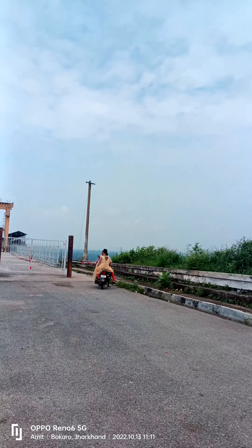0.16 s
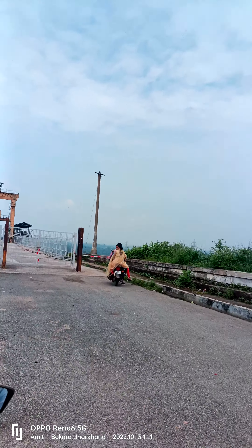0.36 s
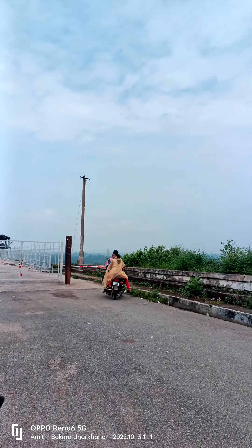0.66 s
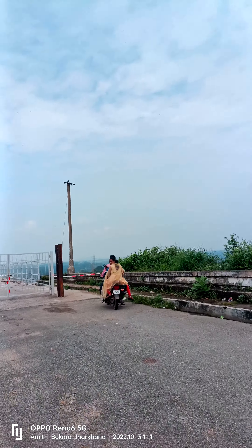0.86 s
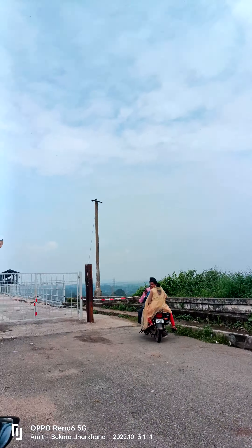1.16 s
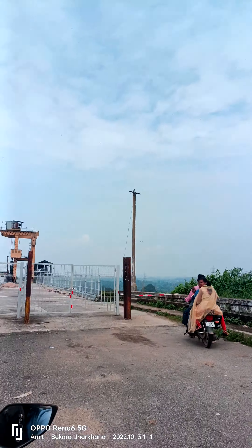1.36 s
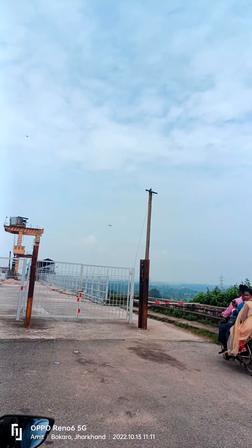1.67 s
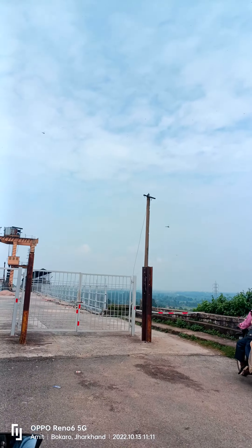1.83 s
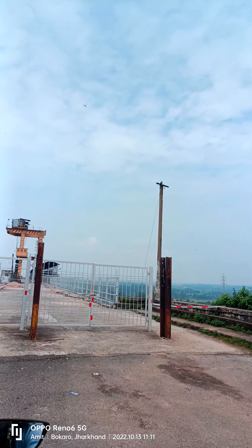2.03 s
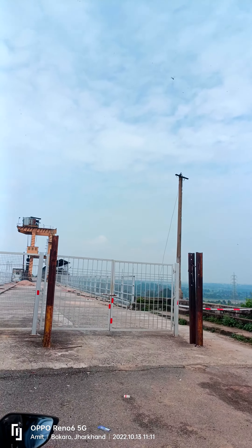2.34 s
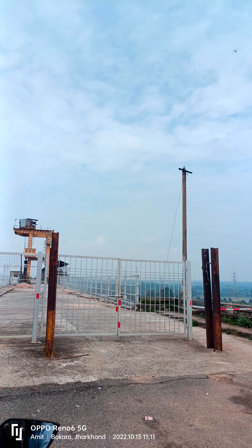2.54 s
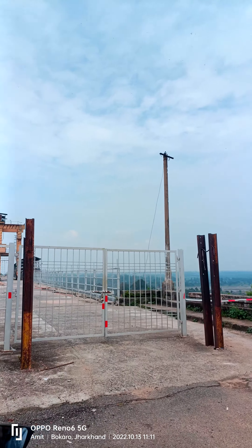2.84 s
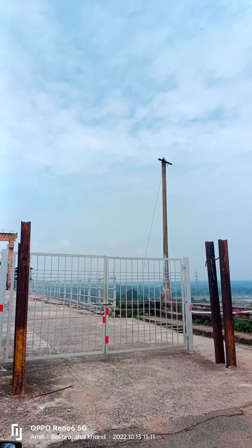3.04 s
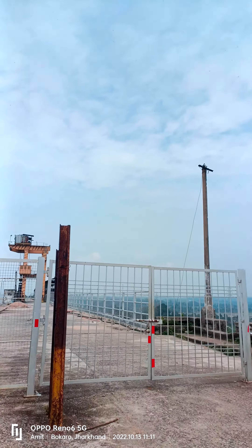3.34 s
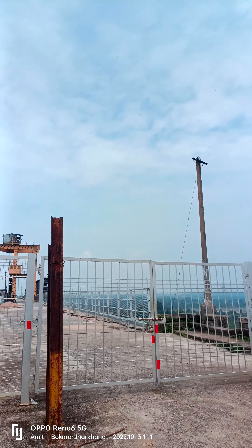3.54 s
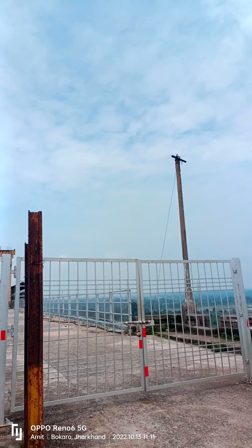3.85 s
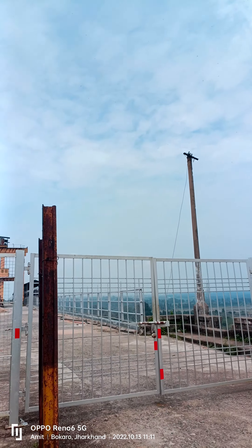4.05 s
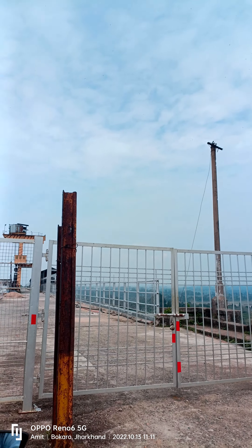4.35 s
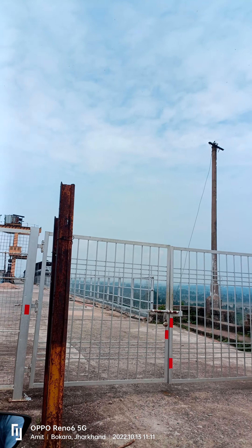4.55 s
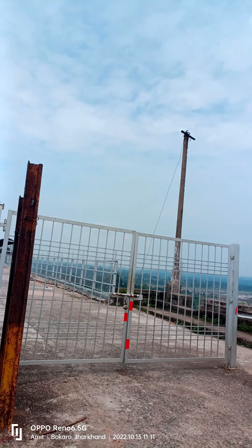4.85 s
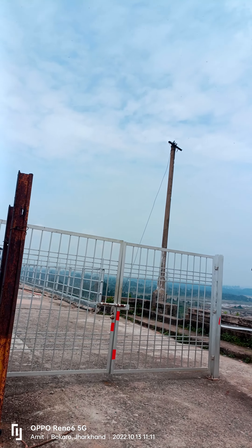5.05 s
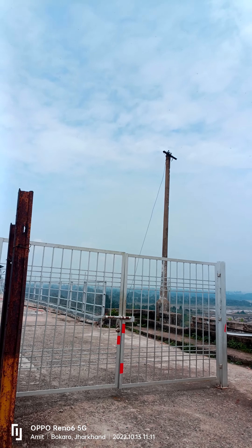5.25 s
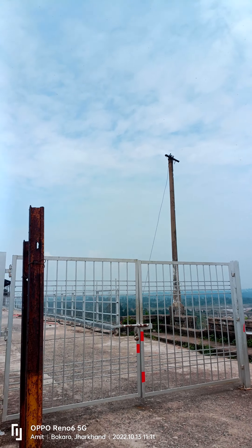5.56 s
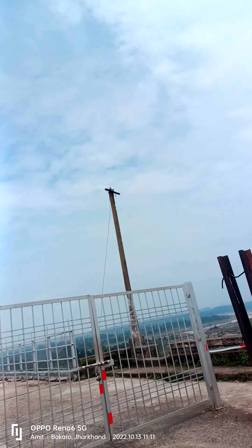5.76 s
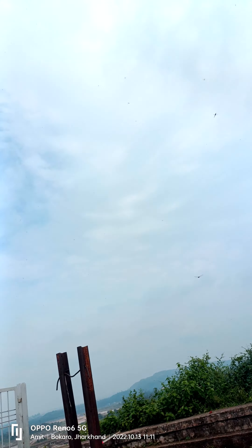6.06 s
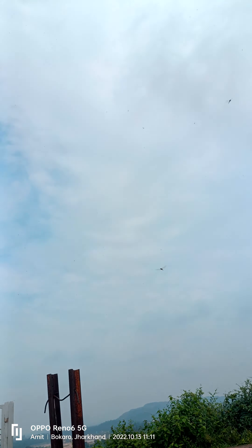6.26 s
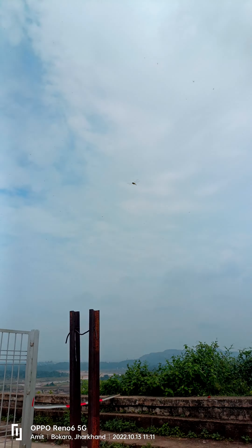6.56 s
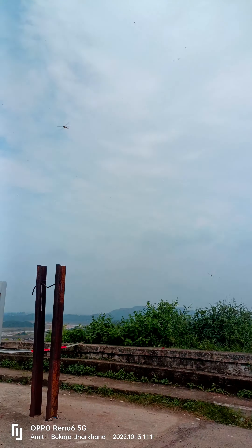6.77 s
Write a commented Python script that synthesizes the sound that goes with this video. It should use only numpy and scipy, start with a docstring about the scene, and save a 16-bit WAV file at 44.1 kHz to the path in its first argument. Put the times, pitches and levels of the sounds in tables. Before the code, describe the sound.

Aboard a single-cylinder motorcycle outdoors, a phone catches rough wind tearing mostly at the right side while deep exhaust puffs slow down. The wind dies as the bike stops, leaving a clear, hunting putter with light valve clatter. A click cuts the engine, it turns over weakly and falls silent; then faint country air, a small click, a hollow knock and scuffs.

```python
"""A single-cylinder motorcycle slows to a stand, its exhaust puttering down to a hunting idle until switch-off.
Its pulses are decaying sines and noise puffs; valve gear clatters as flickering noise and struck resonators.
On the phone held aboard, wind buffets the right microphone port as swelling, tearing noise, with treble hiss.
Clicks, scuffs, rustles and a low gust are noise bursts; a hollow knock is a set of decaying modes.
Faint blurred tones and the steady noise of open country lie behind."""
import sys
import numpy as np
from scipy import signal
from scipy.fft import rfft, irfft, next_fast_len
from scipy.io import wavfile
from scipy.ndimage import uniform_filter1d, minimum_filter1d

SR = 44100
rng = np.random.default_rng(int(sys.argv[2]) if len(sys.argv) > 2 else 0)


def put_to_file(sound):
    """Save the sound as 16-bit audio at rate SR, in the file named by the first command-line argument."""
    columns = np.atleast_2d(sound).T  # one column per channel
    safe = np.clip(columns, -1, 1)
    whole_steps = np.round(safe * 32767)
    wavfile.write(sys.argv[1], SR, whole_steps.astype(np.int16))


N = 304284

# engine and ride
FIRST_PUFF_S, STANDS_S, SWITCH_OFF_S, CRANK_RESTS_S = .01, 3.3, 5.0, 5.42
# each pair: (standing, at the opening speed), joined in proportion to road speed
PUFF_DB, PUFF_SCATTER_DB = (-19, -11), (0.3, 9)
TICK_DB, GASP_DB, CLATTER_DB = (-43, -35), (-32.5, -26), (-51, -37)
KNOCKS_DB = 4, -3  # fin knocks, added to the mechanical hiss
LAST_PUFF_DB, COASTING_DB, CLATTER_FADE_DB_S = -5, -10, 139  # level changes after the switch-off

# exhaust pulse
THUMP_HZ, THUMP_DECAY_S, THUMP_TAIL_DB = 81, 0.025, -17
BARK_HZ, BARK_RISE_HZ_S, BARK_DB, BARK_DECAY_S = 135, 6000, -5, .012
ECHO_S, ECHO_DB, ECHO_HZ = .034, -6, 78  # the thump comes back from the far end of the pipe, lower
RING_HZ, RING_SWELL_S = 280, 0.0036  # the ring's envelope peaks after twice this time
TICK_HZ, TICK_LAG_S = 1767, 0.0272

# wind at the microphone
TEAR_DB, TEAR_PER_DB, LEE_TEAR_DB = -12, 1.28, -15  # on the right, tearing rises faster than the wind
BUFFET_S, EDGE_S, BUFFET_PORT_DB = 0.017, 0.0075, 6.5  # the exposed port hears buffets louder
SMALL_BUFFETS_PER_S, SMALL_BUFFET_DB, SMALL_BUFFET_HZ = 18, -6.5, 766  # level relative to the wind
CRACKS_PER_S, CRACK_DB, CRACK_HZ = 90, -15.5, 1020  # tiny eddies on the port edge; level likewise

KNOCK_S, KNOCK_DB = 6.333, -24
CLEAR_TONE_DB = -11  # clear part of each faint tone
PORT_LAG = 20  # samples; the left port is further from the engine
CEILING = .89  # amplitude at which the gain control aims
TOP_HZ = 15650


def undb(db):
    """Decibels as an amplitude factor."""
    return 10 ** (np.asarray(db) / 20)


def curve(table):
    """Columns of a table, one value per sample."""
    s, *columns = np.transpose(table)
    return [np.interp(np.arange(N) / SR, s, c) for c in columns]


def add(out, s, sound):
    """Mix a short sound in at time s."""
    i = max(int(s * SR), 0)
    out[..., i:i + sound.shape[-1]] += sound[..., :N - i]


def walk(rate):
    """Random levels held 1 / rate s and smoothed twice; spread near 1."""
    k = int(SR / rate)
    steps = np.repeat(rng.standard_normal(N // k + 1), k)
    return 1.085 * uniform_filter1d(uniform_filter1d(steps, k), k)[:N]


def coloured(points, flicker_db, rate, shared=0):
    """Noise of the given colour, rms 1, each octave flickering alone on top of a shared swell in dB."""
    size = next_fast_len(N)
    octaves = np.log2(np.maximum(np.fft.rfftfreq(size, 1 / SR), 1))
    f, db = np.transpose(points)
    whole = rfft(rng.standard_normal(size)) * undb(np.interp(octaves, np.log2(f), db, -120, -120))
    out = np.zeros(N)
    for octave in range(round(np.log2(f[1])), round(np.log2(f[-2])) + 1):
        band = np.cos(np.pi / 2 * np.clip(octaves - octave, -1, 1)) ** 2
        out += irfft(whole * band, size)[:N] * undb(flicker_db * walk(rate))
    out *= undb(shared)
    return out / np.sqrt(np.mean(out ** 2))


def burst(hz, width_hz, envelope, noise):
    """Noise around hz under an envelope, peak near 1."""
    edges = [max(hz - width_hz / 2, 50), min(hz + width_hz / 2, .45 * SR)]
    band = signal.sosfilt(signal.butter(2, edges, "bandpass", fs=SR, output="sos"), noise)
    shaped = envelope * band
    wanted = np.sum((envelope + 0 * band) ** 2, axis=-1, keepdims=True)
    present = np.sum(shaped ** 2, axis=-1, keepdims=True) + 1e-18
    return shaped * np.sqrt(wanted / present) / 2


def rung(x, modes):
    """Blows x ringing a set of damped modes, rms 1."""
    out = 0
    for hz, db, t60 in modes:
        pole = np.exp(2j * np.pi * hz / SR - np.log(1000) / (t60 * SR))
        out = out + undb(db) * signal.lfilter([1], [1, -pole], x).imag
    return out / out.std()


def ports(x, left_db=-2.5):
    """A source nearer the right port: the left hears it later and weaker."""
    return np.array([undb(left_db) * np.roll(x, PORT_LAG), x])


def by_speed(pair, s):
    """A quantity between its standing and its moving value; the bike brakes evenly to a stop."""
    return pair[0] + (pair[1] - pair[0]) * np.clip(1 - s / STANDS_S, 0, 1)


def firings():
    """Engine cycles completed at each sample, and the times of the puffs up to the first after the switch-off."""
    # engine speed, sinking to a hunting idle: time_s, rate [firings per s]
    engine_speed = [(.01, 15.85), (.71, 14.36), (1.41, 11.95), (2.31, 9.0), (2.81, 9.99), (3.16, 9.32),
                    (3.41, 9.64), (3.56, 9.1), (3.73, 9.53), (4.01, 8.98), (4.51, 9.74), (4.71, 9.24),
                    (5.06, 9.7)]
    t = np.arange(N) / SR
    turns = np.cumsum(curve(engine_speed)[0]) / SR
    turns = turns - turns[int(FIRST_PUFF_S * SR)]
    puffs = np.arange(np.ceil(turns[int(SWITCH_OFF_S * SR)]) + 1)
    return turns, np.interp(puffs, turns, t)


def exhaust():
    """Each puff thumps the pipe, rings the silencer on its returns, lets out rough gas and ends in a valve tick."""
    # unfired strokes as the crank runs out: trough_s, level_db
    run_out = [(5.152, -27), (5.192, -22), (5.256, -55), (5.428, -27)]
    # the pulse travels the pipe and rings the silencer at each return: delay_s, level_db (relative to the puff)
    pipe_returns = [(.0012, -11), (.0147, -4.5), (.0259, -19), (.0362, -11.5), (.0490, -17)]
    out, t = np.zeros(N), np.arange(6000) / SR
    times = firings()[1]
    chances, noises = rng.standard_normal((len(times), 10)), rng.standard_normal((len(times), 2, len(t)))
    for s, chance, noise in zip(times, chances, noises):
        db = by_speed(PUFF_DB, s) + by_speed(PUFF_SCATTER_DB, s) * np.tanh(chance[9])
        db += LAST_PUFF_DB * (s > SWITCH_OFF_S)
        start = s - 0.29 / THUMP_HZ  # s is the first trough
        thump_hz = THUMP_HZ * (1 + .015 * chance[0])
        thump = np.sin(2 * np.pi * thump_hz * t) * np.exp(-t / THUMP_DECAY_S)
        # the escaping gas scoops upward from the thump towards the silencer note
        bark_cycles = (BARK_HZ * (1 + 0.07 * chance[8]) + BARK_RISE_HZ_S * t / 2) * t
        bark = np.sin(2 * np.pi * bark_cycles) * np.exp(-t / BARK_DECAY_S)
        add(out, start, -undb(db) * np.minimum(t / 0.00098, 1) * (thump + undb(BARK_DB) * bark))
        add(out, s - .009, undb(db - 12) * np.hanning(330))  # pressure builds first
        echo = np.sin(2 * np.pi * ECHO_HZ * t) * np.exp(-t / THUMP_DECAY_S) * np.minimum(t / .002, 1)
        add(out, start + ECHO_S - .003, -undb(db + ECHO_DB + chance[3]) * echo)

        swell = (t / RING_SWELL_S) ** 2 * np.exp(2 - t / RING_SWELL_S) / 4
        ring = swell * np.sin(2 * np.pi * RING_HZ * (1 + 0.015 * chance[1]) * t)
        for k, (delay, gain_db) in enumerate(pipe_returns):
            return_s = start + delay + .0002 * chance[6 - k]
            add(out, return_s, undb(db + gain_db + 1.8 * chance[2 + k]) * ring)

        # rough gas in two bands
        add(out, start, undb(db - 17) * burst(125, 80, t / .025 * np.exp(1 - t / .025), noise[0]))
        add(out, start, undb(db - 26) * burst(430, 260, t / .02 * np.exp(1 - t / .02), noise[0, ::-1]))
        # the pipe rumbles on unevenly after the thump
        tail = burst(84, 54, (t / 0.06) ** 2 * np.exp(2 - t / 0.03), noise[1])
        add(out, start, undb(db + THUMP_TAIL_DB) * tail)
        # the intake gasps just before the firing
        gasp = burst(715, 1030, t / 0.017 * np.exp(1 - t / 0.016), noise[1])
        add(out, s - .035, undb(by_speed(GASP_DB, s)) * gasp)
        tick = np.sin(2 * np.pi * TICK_HZ * (1 + 0.0085 * chance[6]) * t)
        tick *= (t / 0.0025) * np.exp(1 - t / 0.0031)
        add(out, s + TICK_LAG_S, undb(by_speed(TICK_DB, s) + 3 * chance[7]) * tick)
    for s, db in run_out:
        stroke = np.sin(2 * np.pi * 85 * t) * np.exp(-t / 0.021) * np.minimum(t / 0.0013, 1)
        add(out, s - 0.26 / 85, -undb(db) * stroke)
    return ports(out)


def clatter():
    """Mechanical hiss and uneven knocks in the fins, swelling once a cycle; part comes direct, part scattered."""
    # colour of the mechanical hiss: frequency_hz, density_db (relative, per Hz)
    hiss_colour = [(260, -40), (450, 4), (596, -25), (691, -14), (801, -4.5), (1180, -7.5), (1350, -25),
                   (1470, 1.5), (1920, -12), (2070, -5.5), (2780, -12), (4200, -11.5), (4450, -12.5),
                   (4620, -8.5), (4800, -15), (5050, -13.5), (5400, -21), (7000, -18), (9000, -25),
                   (13900, -63), (15500, -42)]
    # fins and covers that ring when the valve gear knocks: mode_hz, level_db (relative), t60_s
    fin_modes = [(800, -6, .025), (1480, 0, .02), (1770, -1, .02), (2050, 0, .022), (2400, -7, .012),
                 (3230, -4, .025), (4300, -9, .015), (4650, -8, .02)]
    t, (turns, times) = np.arange(N) / SR, firings()
    turns = np.minimum(turns, len(times) - 1)
    swell_db = 3.2 * np.cos(2 * np.pi * (turns - .85)) + 2.0 * walk(9.6)
    direct, left, right = (coloured(hiss_colour, 3.5, 30, swell_db) for _ in range(3))
    blows = (rng.random(N) < 90 / SR) * undb(2.2 * rng.exponential(size=N)) * rng.choice([-1, 1], N)
    blows *= undb(9.5 * np.cos(2 * np.pi * (turns - .35)))
    # a valve seats hard just before each puff
    seats = np.maximum((times - .022) * SR, 0).astype(int)
    blows[seats] = undb(12.0 + 3.1 * rng.standard_normal(len(times)))
    direct += undb(by_speed(KNOCKS_DB, t)) * rung(blows, fin_modes)
    coasting = np.clip((t - SWITCH_OFF_S) / (CRANK_RESTS_S - SWITCH_OFF_S), 0, 1) ** .5
    level_db = by_speed(CLATTER_DB, t) + COASTING_DB * coasting
    level_db -= CLATTER_FADE_DB_S * np.maximum(t - CRANK_RESTS_S + 0.036, 0)
    return undb(level_db) * (ports(direct, -17.5) + undb(3.5) * np.array([left, right]))


def wind():
    """Eddies rumble on each port alone; on the exposed right port they tear in bright bursts."""
    # wind on the ports, before gusts and buffets: time_s, right_db, left_db
    port_wind = [(0, -10, -7), (.35, -5.5, -23.5), (2.4, -7.5, -19.5), (2.49, -10.5, -25), (2.54, -15, -24),
                 (2.572, -2.5, -30), (2.595, -24.5, -25), (2.63, -9.5, -29), (2.665, -22.5, -31),
                 (2.72, -24, -27), (2.75, -10, -37), (2.775, -14, -36), (2.81, -5.5, -35),
                 (2.856, -19, -44), (2.92, -21, -43), (2.955, -29, -39), (3.01, -17.5, -28.5),
                 (3.032, -4, -43), (3.058, -20.5, -42), (3.075, -7, -42), (3.11, -13.5, -46),
                 (3.132, -7, -48), (3.19, -28, -30), (3.23, -17.5, -30), (3.27, -25.5, -45),
                 (3.35, -31, -37)]
    # colours of the deep eddies and of the tearing: frequency_hz, density_db (relative, per Hz)
    rumble_colour = [(12, -78), (20, -8.5), (80, -1.5), (128, 2), (195, -6), (226, -4), (270, 1),
                     (392, -7.5), (568, -15.5), (700, -27.5), (910, -29), (1540, -120)]
    tear_colour = [(240, -28), (400, 1.5), (686, -8), (951, -4.5), (1400, -14), (1910, -30), (2260, -44),
                   (2740, -50), (5000, -41), (6500, -39), (11000, -120)]
    # gusts that wrap round to the left port: centre_s, rise_db, length_s
    lee_gusts = [(0.157, -7, 0.062), (1.075, 12.5, 0.13), (1.358, 13.5, 0.044), (1.564, 6, 0.069),
                 (1.727, 7, .06), (2.12, 0, 0.053), (2.424, 8.5, 0.026)]
    # sharp buffets on the right port: start_s, level_db (relative), body_hz, body_db (added to level_db)
    sharp_buffets = [(0.1161, -14, 780, 7), (0.1426, -21, 830, -6), (0.2004, -27.5, 980, 1.5),
                     (0.2304, -6, 650, -5), (0.3222, -16, 540, 6), (0.4145, -26.5, 598, 8.5),
                     (0.4589, -3.5, 607, -6), (0.5072, -14, 543, -3.5), (0.6075, 2, 506, -9),
                     (0.6244, -24, 522, 9.5), (0.7108, -1, 501, -7.5), (0.7344, -5, 580, -5),
                     (0.7715, -7, 620, -1), (0.852, -24, 552, -6), (0.8764, -22, 545, 1.5),
                     (0.9314, -22, 565, -4), (1.0231, -6.5, 530, 0), (1.0889, -29, 501, 4),
                     (1.1019, -22, 600, 11.5), (1.1657, -28, 606, -6), (1.2346, -14, 845, 0.5),
                     (1.2594, -8, 530, -7), (1.3084, -20, 595, 5), (1.3264, -13.5, 636, 2),
                     (1.3494, -3, 501, -8), (1.3744, -14.5, 755, 2.5), (1.3982, -17, 608, -10),
                     (1.4386, -9.5, 956, -3.5), (1.4646, -3, 1000, -5), (1.4794, 2, 510, -20),
                     (1.5194, -10, 550, -7), (1.5354, -3, 560, -14.5), (1.5644, -13.5, 624, 1),
                     (1.6172, -22, 565, 0), (1.6666, -23.5, 500, 6.5), (1.7434, -17.5, 552, 3),
                     (1.7654, -32, 501, -1), (1.8098, -21, 676, 3), (1.836, -12, 773, -2),
                     (1.866, -5, 620, 0), (1.9086, -28, 990, 0), (1.934, -12, 600, -2),
                     (2.0542, -6.5, 525, -5.5), (2.0744, -11, 506, -5), (2.1484, -8, 560, -2),
                     (2.2094, -24, 640, 4), (2.2722, -26, 501, 10), (2.3366, -13.5, 560, -1),
                     (2.382, -30, 630, 1), (2.4219, -25, 503, 10), (2.4798, -26, 581, 11.5),
                     (2.5144, -27.5, 497, 6), (2.5656, -3, 650, -3), (2.6244, -42, 552, 5),
                     (2.7457, -35, 519, 7.5), (2.7985, -28.5, 570, 11.5), (2.8374, -22.5, 520, -0.5),
                     (2.8694, -40, 528, 2), (2.9094, -38, 565, 2), (3.0285, -18, 530, 2),
                     (3.0639, -18, 556, -1.5), (3.1018, -27, 644, 6.5), (3.1238, -6, 910, -5)]
    right_db, left_db = curve(port_wind)
    for s, db, length in lee_gusts:
        left_db = left_db + db * np.exp(-((np.arange(N) / SR - s) / length * 2) ** 2)
    tear_db = right_db + TEAR_DB + TEAR_PER_DB * (right_db - right_db.max()) + 4.0 * walk(10.42)
    eddy_db = 2.54 * walk(45.02)
    right = coloured(rumble_colour, 0.82, 25.15, eddy_db) * undb(right_db)
    right = signal.sosfilt(signal.butter(1, 50, "highpass", fs=SR, output="sos"), right)
    right += coloured(tear_colour, 1.9, 60, 2.22 * eddy_db + 7.8 * walk(180)) * undb(tear_db)

    t, crackle = np.arange(3000) / SR, undb(2.5 * walk(200))
    buffets = np.zeros(N)
    noises = rng.standard_normal((len(sharp_buffets), 3, len(t)))
    for (s, db, hz, body_db), noise in zip(sharp_buffets, noises):
        length = BUFFET_S * 1.05 ** noise[2, 0]
        attack = np.sin(np.pi / 2 * np.minimum(t / 0.0022, 1)) ** 2
        body = burst(hz, 0.62 * hz, attack * np.exp(-(t / max(length, .003)) ** 4), noise[0])
        add(buffets, s - .002, undb(db + body_db + BUFFET_PORT_DB) * body)
        edge = burst(1084, 1180, np.minimum(t / 0.00076, 1) * np.exp(-t / EDGE_S), noise[1])
        add(buffets, s, undb(db + BUFFET_PORT_DB - 12) * edge)

    # the many lesser buffets, and tiny eddies snapping
    small_db = tear_db - TEAR_DB
    starts = (rng.random(N) < SMALL_BUFFETS_PER_S / SR) * undb(1.7 * rng.standard_normal(N))
    swells = signal.fftconvolve(starts, np.hanning(int(BUFFET_S * SR)))[:N]
    small = burst(SMALL_BUFFET_HZ, 730, swells, rng.standard_normal(N))
    buffets += undb(small_db + SMALL_BUFFET_DB) * small
    cracks = (rng.random(N) < CRACKS_PER_S / SR) * undb(2.6 * rng.exponential(size=N)) * rng.choice([-1, 1], N)
    buffets += undb(small_db + CRACK_DB) * burst(CRACK_HZ, 1260, 0.7, cracks)
    # eddies are large and slow: nothing sharp in the treble
    buffets = signal.sosfilt(signal.butter(4, 2600, fs=SR, output="sos"), crackle * buffets)

    gust_db = 5.5 * walk(29.74)
    left = coloured(rumble_colour, 0.8, 25.3, gust_db) * undb(left_db)
    left += coloured(tear_colour, 7.7, 40.9, gust_db) * undb(left_db + LEE_TEAR_DB)
    still = np.clip((3.4 - np.arange(N) / SR) / 0.082, 0, 1)  # this wind dies out by 3.4 s
    return still * np.array([left, right + buffets])


def rush():
    """Air around the phone body: treble hiss around the port resonance, fading as the bike stops and after."""
    # treble hiss before the offset of each port: time_s, level_db
    air_hiss = [(0, -45.5), (1.2, -48.5), (1.7, -50), (2.5, -50.5), (3.5, -59.5), (4.2, -61), (5.3, -67.5),
                (5.45, -71), (6.9, -72)]
    running = np.arange(N) / SR < SWITCH_OFF_S
    pulse_db = 2.5 * np.cos(2 * np.pi * (firings()[0] - .85)) * running  # the engine breathes in it
    flicker = undb(1.5 * walk(9) + 2.2 * walk(40) + pulse_db)
    hiss = 2 * burst(12000, 4000, flicker, rng.standard_normal((2, N)))
    return undb(curve(air_hiss)[0] + np.array([[-1.5], [1.5]])) * hiss


def scuffs_and_knock():
    """Short noise bursts click, scuff and rumble; one bouncing knock sounds the modes of a hollow panel."""
    # clicks, scuffs and rustles, with a low wind gust and the engine's run-out rumble:
    # start_s, level_db, centre_hz, width_hz, decay_s, pan_db (left minus right)
    short_bursts = [(0.8594, -11.5, 5100, 4300, 0.00078, 23.5), (2.025, -24, 5000, 6000, 0.0016, 17),
                    (2.660, -32, 7000, 2000, 0.0017, 10), (2.678, -17.5, 1830, 700, 0.0057, -1),
                    (2.688, -25.5, 1810, 700, 0.0083, 0), (2.835, -45, 1890, 800, 0.0057, -8),
                    (4.357, -25.5, 5200, 4400, 0.018, 5), (4.595, -29, 1960, 500, 0.031, -3),
                    (4.612, -23, 4500, 6500, 0.018, 3), (4.997, -17, 4500, 700, 0.0022, 9),
                    (4.998, -24, 3200, 500, 0.003, 5), (4.997, -17, 10000, 8000, 0.0014, -1),
                    (5.004, -35, 5000, 8000, 0.014, -6), (5.134, -41, 1800, 200, .01, -6),
                    (5.150, -40, 2050, 120, 0.03, -10), (5.151, -39, 2300, 500, .004, -6),
                    (5.158, -38, 2750, 500, .005, -6), (5.153, -40, 4900, 1400, .004, 0),
                    (5.192, -38, 1780, 200, .008, -6), (5.400, -43, 2070, 1200, 0.0064, -15),
                    (5.58, -45, 1390, 604, 0.052, -1), (5.622, -45.5, 3860, 2190, 0.038, -4),
                    (5.44, -53, 4550, 300, .015, 0), (5.645, -44, 2400, 900, .02, 0),
                    (5.655, -47, 4700, 700, .012, 0), (5.85, -55, 4400, 1400, .06, 0),
                    (5.911, -27, 7000, 7000, 0.0022, 6.5), (5.911, -27, 5000, 2200, .002, 6),
                    (5.911, -46, 1700, 2000, .002, 0), (6.094, -45, 2200, 2030, 0.021, 1),
                    (6.335, -36, 2700, 900, 0.02, 2), (6.355, -47, 12500, 6000, 0.069, -11),
                    (6.405, -38, 1700, 1600, 0.0075, 12), (6.422, -33.5, 1710, 1600, 0.014, -2),
                    (6.473, -38, 2500, 4000, 0.002, 0), (6.492, -38, 3800, 2000, 0.0026, .5),
                    (6.492, -25, 1930, 700, 0.0045, 3), (6.492, -30, 2100, 1800, .002, 0),
                    (6.502, -30, 2050, 800, .012, 3), (6.336, -26.5, 726, 600, 0.024, 2),
                    (4.579, -23.5, 128, 134, 0.046, -19.5), (5.239, -35.5, 338, 198, 0.17, -2),
                    (6.614, -37, 380, 350, 0.04, 1), (6.665, -40, 400, 400, .02, 0),
                    (6.654, -39, 90, 70, 0.024, 12), (5.626, -39, 495, 700, 0.048, -3),
                    (6.615, -48.5, 2210, 3500, 0.11, -2), (6.661, -52, 4300, 900, 0.044, -10),
                    (3.848, -35.5, 2780, 3000, 0.07, -4), (6.34, -40.5, 4600, 2500, 0.072, 0),
                    (6.741, -46, 5700, 8000, 0.032, 1), (6.779, -34, 1350, 600, 0.004, 0),
                    (6.776, -37, 380, 250, 0.013, -2), (6.302, -40, 400, 404, .008, -5),
                    (3.582, -34, 7000, 9000, 0.0014, 8)]
    # the panel before it is damped: mode_hz, level_db (relative), t60_s
    panel_modes = [(312, .5, .3), (571, -10, .07), (818, -4, .06), (950, -5, .05), (1500, -15, .05),
                   (2460, -9, .04), (2900, -14, .06)]
    out, t = np.zeros((2, N)), np.arange(9000) / SR
    noises = rng.standard_normal((len(short_bursts), 2, len(t)))
    for (s, db, hz, width_hz, decay, pan_db), noise in zip(short_bursts, noises):
        envelope = np.exp(-t / max(decay, 3e-4)) * np.minimum(t / max(0.12 * decay, 1e-4), 1)
        port_db = db + np.array([[pan_db], [-pan_db]]) / 2
        add(out, s, undb(port_db) * burst(hz, width_hz, envelope, noise))
    ring = np.zeros(len(t))
    for hz, db, t60 in panel_modes:
        attack = np.minimum(t * hz / 3, 1)
        ring += undb(db) * np.sin(2 * np.pi * hz * t) * attack * 1000. ** (-t / t60)
    for lag, db in ((0, -4), (.0096, -7)):  # the knock and its bounce
        add(out, KNOCK_S + lag, undb(KNOCK_DB + db) * ring * np.exp(-(t / .055) ** 2))
    return out


def blurred_tones():
    """Soft, breathy tones: a clear tone in narrow noise that swells and fades."""
    # faint blurred tones, perhaps a tyre rolling or something rubbing:
    # start_s, length_s, pitch_hz, width_hz, level_db
    faint_tones = [(6.64, .035, 1380, 150, -45), (6.685, .07, 1400, 200, -45), (6.745, .07, 1350, 200, -44),
                   (6.745, .05, 4020, 200, -47), (6.800, .065, 4100, 250, -48),
                   (6.865, .035, 4000, 250, -51), (6.735, .06, 2170, 150, -52),
                   (6.805, .06, 2150, 200, -52), (6.66, .22, 2200, 500, -52), (6.68, .2, 1400, 400, -51),
                   (6.74, .16, 830, 120, -52)]
    out = np.zeros((2, N))
    noises = rng.standard_normal((len(faint_tones), 2, 12000))
    for (s, length, hz, width_hz, db), noise in zip(faint_tones, noises):
        n = int(length * SR)
        swell = np.hanning(n)
        breath = burst(hz, width_hz, swell, noise[:, :n])
        clear_tone = swell * np.sin(2 * np.pi * hz * np.arange(n) / SR)
        add(out, s, undb(db) * (breath + undb(CLEAR_TONE_DB) * clear_tone))
    return out


def country():
    """Distant air and traffic: alike on both ports in the bass, unrelated in the treble."""
    # open country: time_s, level_db
    country_level = [(3.3, -42), (3.5, -39.5), (4.4, -43.5), (5.23, -42), (5.35, -49.5), (5.52, -49),
                     (5.66, -47), (5.8, -47), (5.98, -46.5), (6.05, -50), (6.14, -46.5), (6.28, -49.5),
                     (6.43, -48.5), (6.57, -52), (6.66, -47), (6.9, -47.5)]
    # its colour: frequency_hz, density_db (relative, per Hz)
    country_colour = [(18, -55), (34, -2.5), (193, -3.5), (233, -6), (266, 1), (430, -3), (665, -9.5),
                      (740, -16), (803, -5), (894, -13), (1140, -15), (1530, -14), (2450, -15.5),
                      (2800, -22), (4600, -22.5), (5560, -29), (6540, -34), (8110, -37.5), (15500, -81)]
    swell_db = 1.1 * walk(7)
    common, left, right = (coloured(country_colour, 2.45, 10, swell_db) for _ in range(3))
    bass = signal.sosfilt(signal.butter(2, 600, fs=SR, output="sos"), common)
    treble = signal.sosfilt(signal.butter(2, 600, "highpass", fs=SR, output="sos"), [left, right])
    return undb(curve(country_level)[0]) * (ports(bass, -.3) + undb(-1.5) * treble)


def scene():
    """All sources together at the left and right ports."""
    return exhaust() + clatter() + wind() + rush() + scuffs_and_knock() + blurred_tones() + country()


def record(dry):
    """The phone cuts deep bass, lowers its gain just ahead of wind peaks, opens without a click and cuts the top."""
    x = signal.sosfilt(signal.butter(2, 38, "highpass", fs=SR, output="sos"), dry)
    need = np.minimum(CEILING / (np.abs(x) + 1e-9), 1)
    # each port has its own gain; the smoothing window looks ahead as well as back
    gain = uniform_filter1d(minimum_filter1d(need, size=177), size=177)
    opening = np.minimum(np.arange(N) / 64, 1)
    top_cut = signal.ellip(10, .2, 50, TOP_HZ, fs=SR, output="sos")
    return signal.sosfilt(top_cut, x * gain * opening)


dry = scene()
out = record(dry)
put_to_file(out)
```